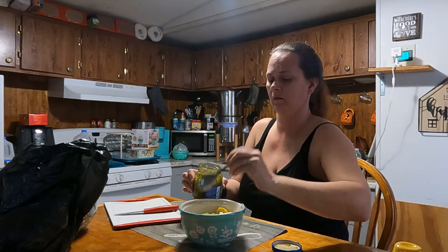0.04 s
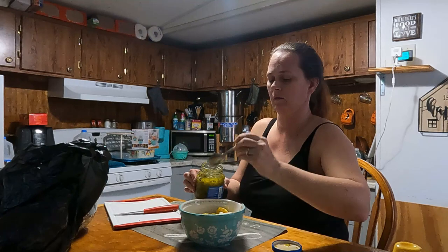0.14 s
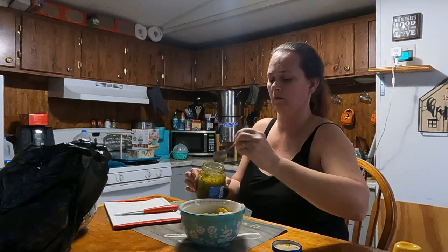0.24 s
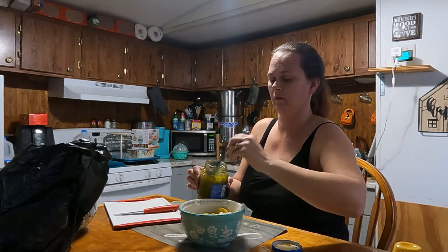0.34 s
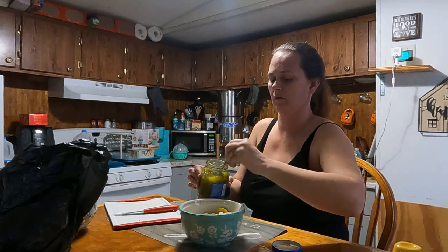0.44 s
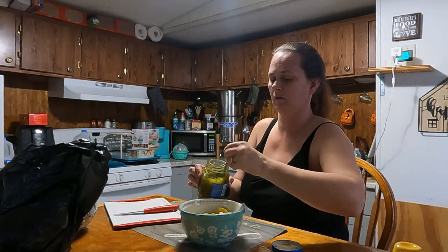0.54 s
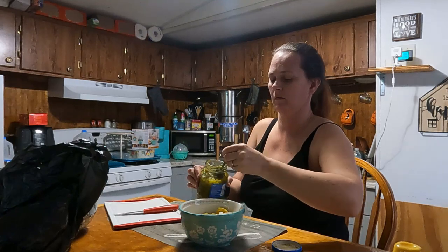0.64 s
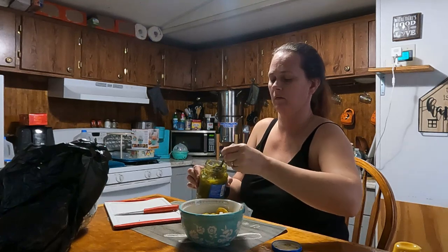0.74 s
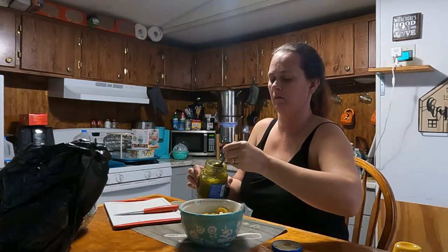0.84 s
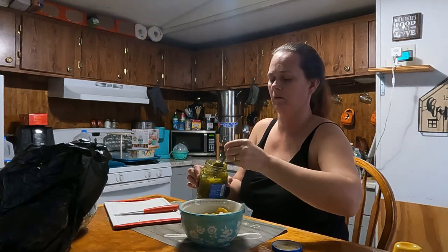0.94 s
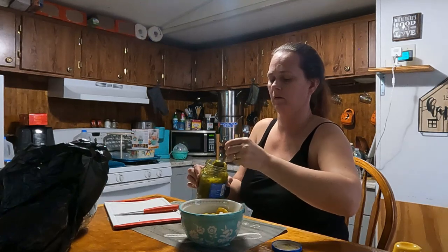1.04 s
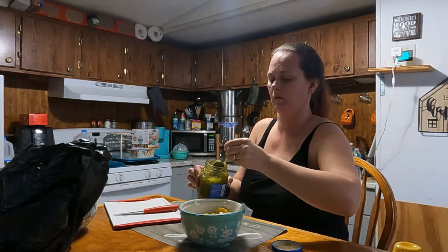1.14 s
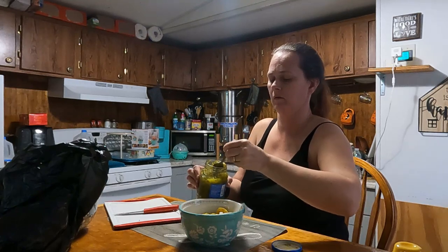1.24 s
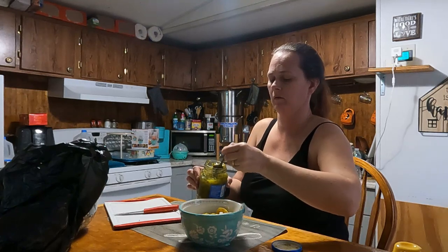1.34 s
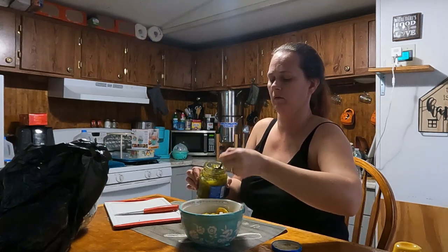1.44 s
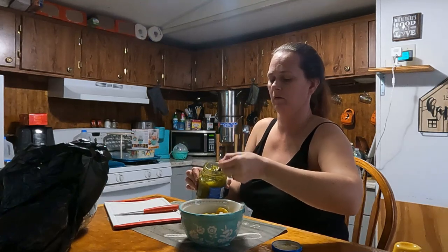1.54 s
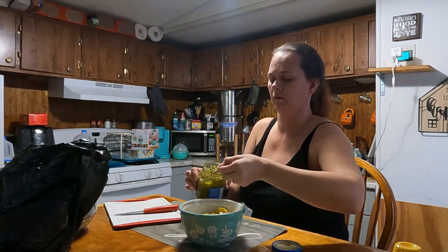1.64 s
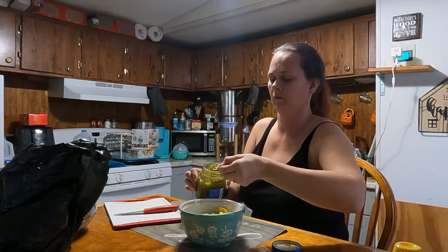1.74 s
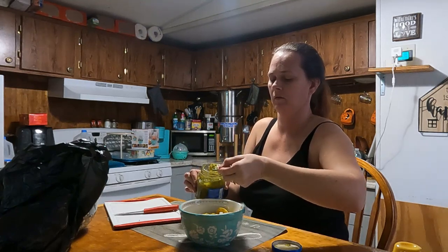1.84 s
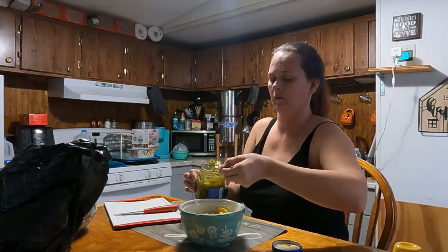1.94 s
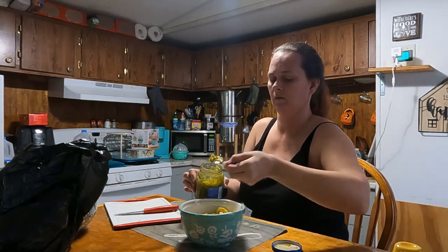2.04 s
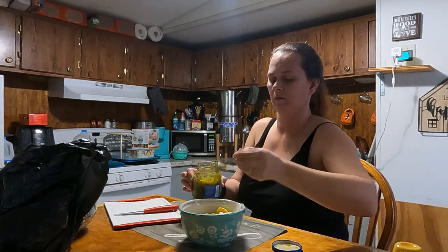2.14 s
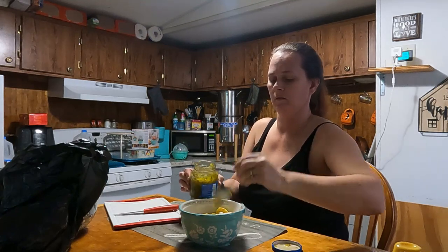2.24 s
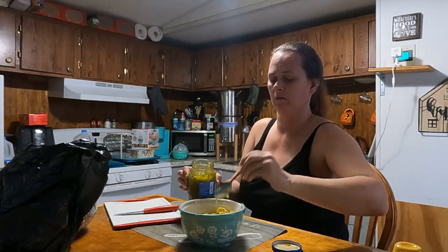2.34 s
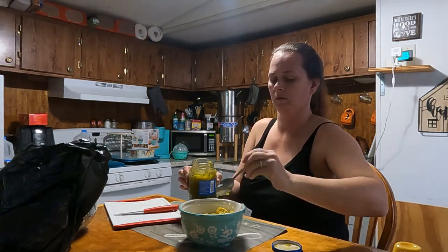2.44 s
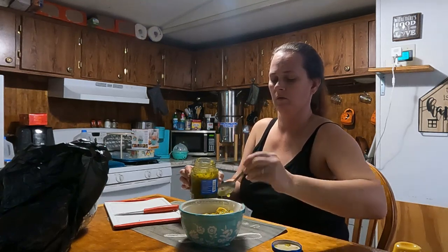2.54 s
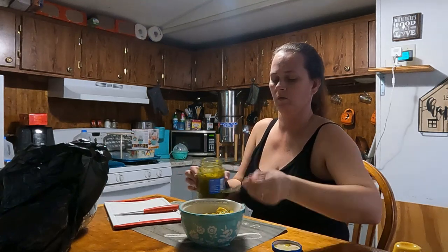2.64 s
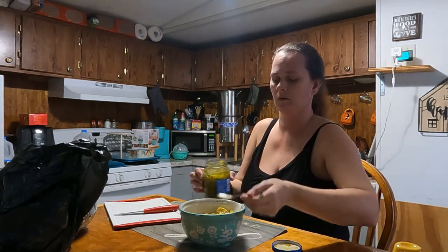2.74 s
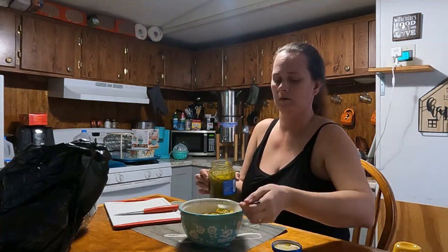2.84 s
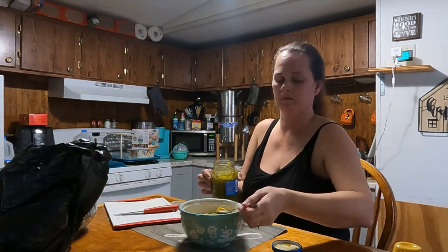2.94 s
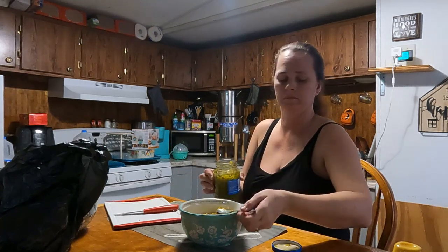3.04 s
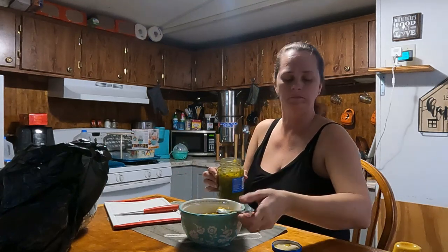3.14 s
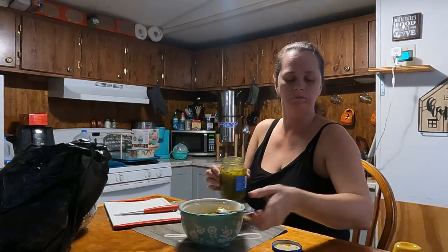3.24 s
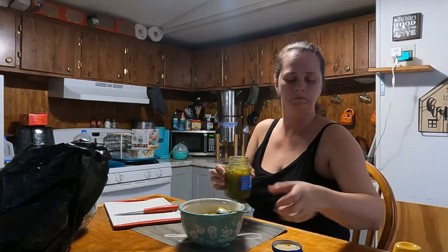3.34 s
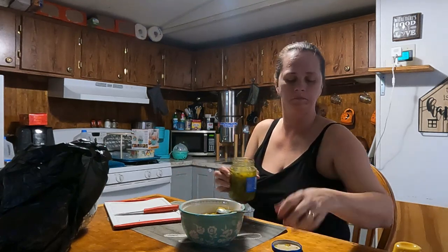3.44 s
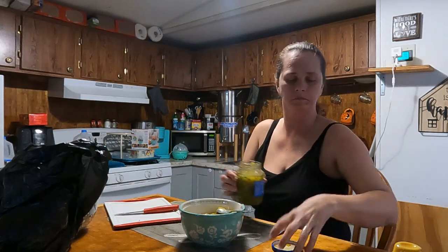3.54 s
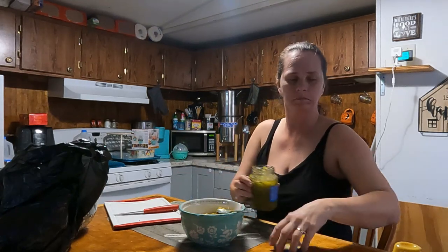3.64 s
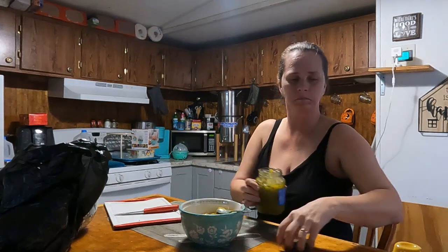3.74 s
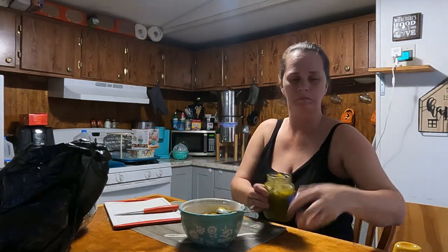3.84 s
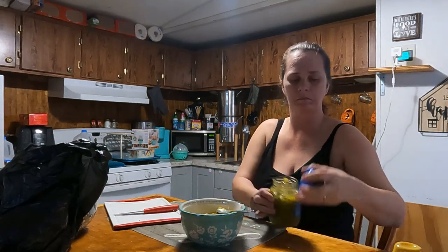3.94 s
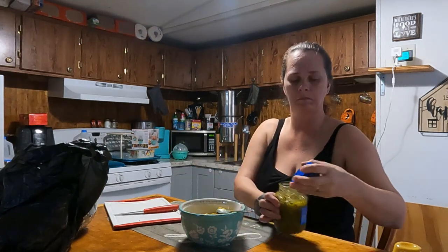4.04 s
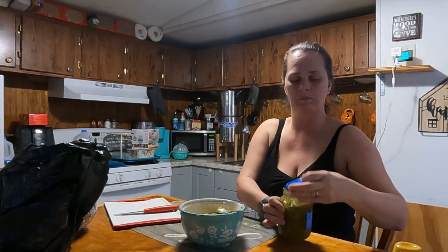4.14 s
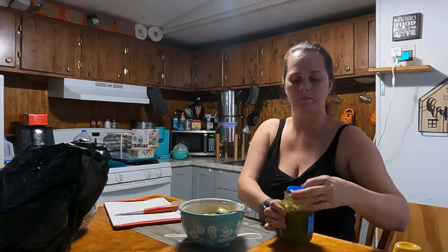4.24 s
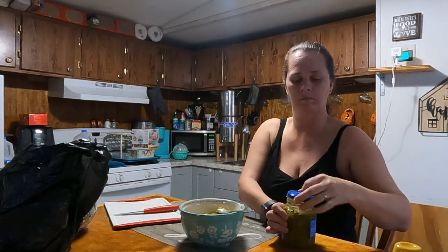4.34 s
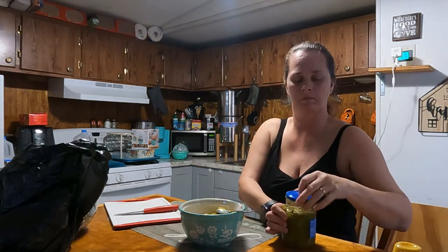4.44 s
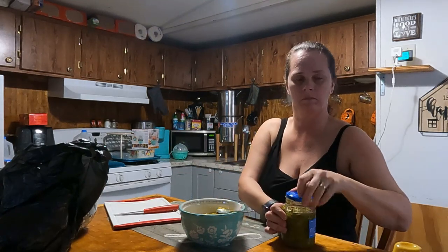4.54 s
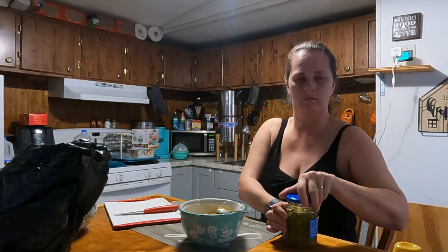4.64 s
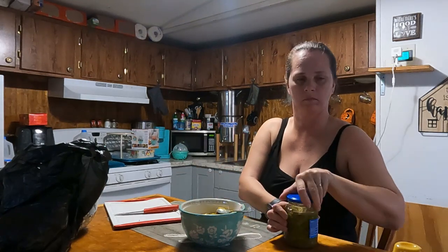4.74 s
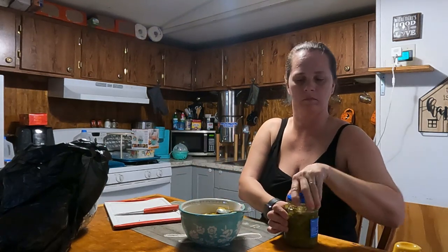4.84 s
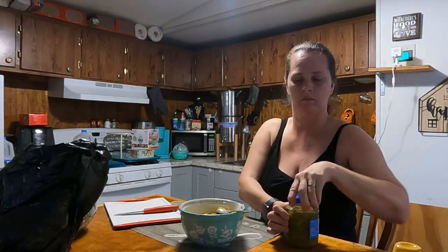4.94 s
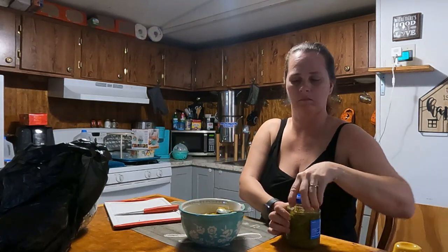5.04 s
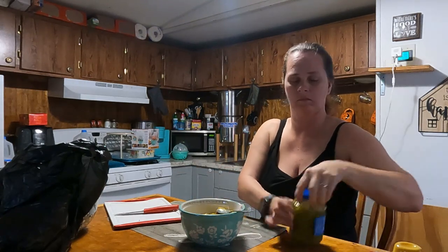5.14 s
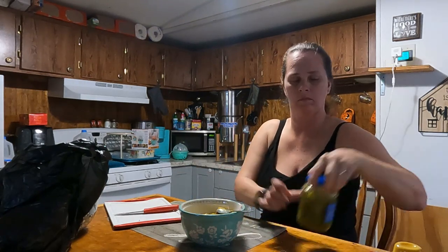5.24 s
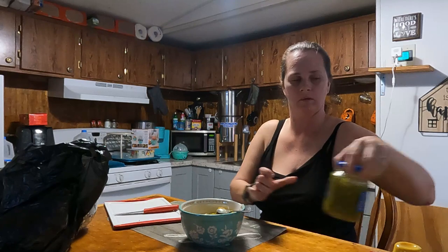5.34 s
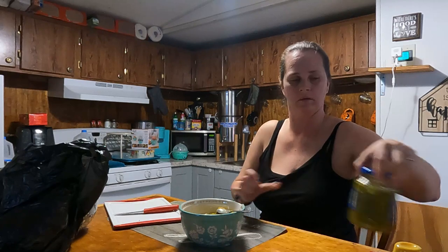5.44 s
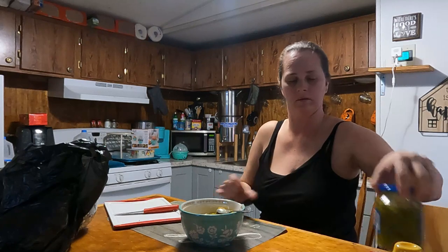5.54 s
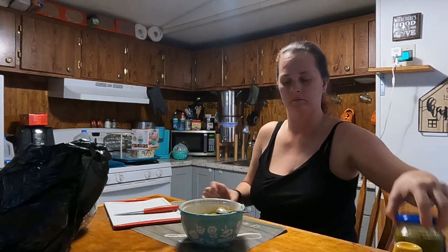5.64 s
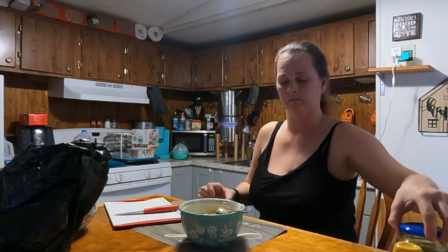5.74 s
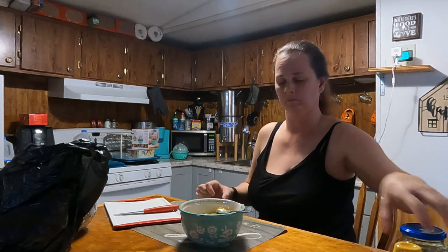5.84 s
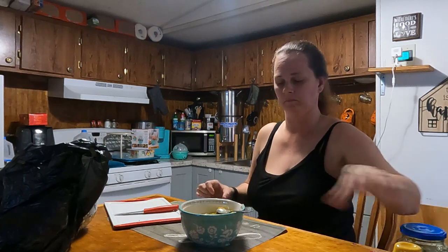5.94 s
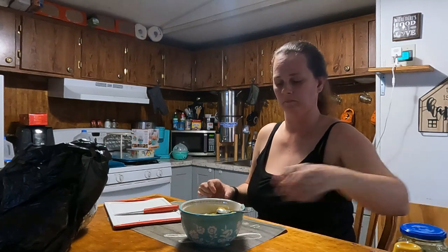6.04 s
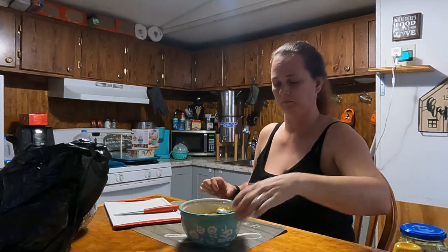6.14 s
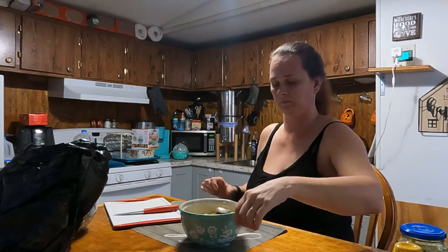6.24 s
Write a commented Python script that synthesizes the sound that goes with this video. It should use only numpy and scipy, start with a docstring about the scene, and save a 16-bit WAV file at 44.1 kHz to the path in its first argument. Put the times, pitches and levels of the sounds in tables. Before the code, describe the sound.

A spoon clinks on a full glass jar, then in a ceramic bowl; a lid is knocked on, twisted tight, and the jar thumps down.

```python
"""Jar, spoon and lid at a kitchen table

A spoon clinks in the neck of a full glass jar and is laid in a ceramic bowl. A lid is picked up, knocked onto
the jar and screwed tight while the jar bumps the table; the jar is set down and the spoon jingles in the bowl.
Blows are clicks with noise chatter driving decaying modes; the thread is random slips, clatter is noise puffs.
An appliance drones and hisses behind as coloured noise; the small room rings briefly."""
import sys
import numpy as np
from scipy import signal
from scipy.fft import rfft, irfft
from scipy.io import wavfile

SR = 44100
rng = np.random.default_rng(int(sys.argv[2]) if len(sys.argv) > 2 else 0)


def file_out(sig):
    """Save sig as 16-bit WAV at sys.argv[1]."""
    # one column per channel
    cols = np.atleast_2d(sig).T
    # limit, then scale
    lim = np.clip(cols, -1, 1)
    pcm = np.round(lim * 32767).astype(np.int16)
    wavfile.write(sys.argv[1], SR, pcm)


N = 277565

# room tone level, lower late on: t/s, level/dB rms
TONE_LEVEL = [(0, -48.5), (4.1, -48.5), (5.25, -51.5), (5.55, -49.5), (5.85, -49), (6.29, -55)]
# room tone colour, relative: f/Hz, density/dB
TONE_SPECTRUM = [(15, -72.5), (25, -50), (48, -19.5), (132, -18.5), (178, 0.5), (221, -7), (252, -3),
                 (456, -8), (2230, -21), (3070, -21.5), (3910, -29.5), (6880, -37.5), (9010, -57),
                 (11800, -47), (15400, -71)]
# casing resonances on that colour: f/Hz, width/Hz, lift/dB
TONE_PEAKS = [(57, 14, 0.5), (253, 7.3, 15.5), (312, 22, 7), (3023, 380, 6.5)]

# echo decay: f/Hz, t60/s
ROOM_T60 = [(100, 0.2), (300, 0.33), (1000, 0.35), (3000, 0.31), (8000, 0.3), (14000, 0.31)]
ROOM_DB, ROOM_GAP_S = -3, 0.0015

# noise puffs: spoon clatter, the lid picked up, brushing, rattle after table knocks:
# t/s, level at onset/dB, centre f/Hz, t60/s
NOISE_PUFFS = [(.064, -59, 4750, 0.034), (0.48, -29, 3520, 0.12), (.503, -30, 2500, 0.12),
               (1.392, -64, 3250, 0.23), (2.42, -42, 4760, 0.021), (2.88, -55, 1500, 0.46),
               (3.801, -42.5, 1500, 0.17), (3.809, -27.5, 1750, 0.035), (4.459, -28, 1500, 0.053),
               (4.791, -30, 2770, 0.12), (5.042, -43, 2140, 0.029), (5.866, -30.5, 1500, 0.38)]
PUFF_WIDTH = 0.86   # times the centre
# cloth swishes as the arm carries the jar away
SWISH_S, SWISH_SPREAD_S, SWISH_DB, SWISH_HZ = 5.6, 0.16, -60, 3050

# single short rings and soft low thuds, one of them the lid: t/s, strength/dB, f/Hz, t60/s
RINGS_AND_THUDS = [(0.744, -35, 1400, 0.02), (2.894, -42.5, 1770, 0.047), (2.93, -46, 1830, 0.048),
                   (2.951, -46, 2520, 0.045), (2.974, -51, 1830, .06), (3.008, -28.5, 230, .06),
                   (3.02, -47.5, 1826, 0.05), (3.024, -25.5, 241, 0.055), (4.585, -28, 3950, 0.046),
                   (5.714, -35.5, 2180, 0.011), (5.87, -60, 1855, 4.4)]

# hand, bowl, jar and the lid as it is picked up, on the table top: t/s, strength/dB, favoured f/Hz
TABLE_KNOCKS = [(2.877, -43, 265), (3.193, -30.5, 242), (3.808, -25.5, 527), (4.462, 1, 326),
                (4.519, -13, 280), (4.589, -24, 258), (4.804, -14.5, 250), (4.821, -20, 396),
                (5.039, -19.5, 380), (5.068, -38.5, 400), (5.091, -40, 300), (5.854, -15, 450),
                (5.8636, 1, 243)]
# table top modes: f/Hz, level/dB, t60/s
TABLE_MODES = [(153.6, -15, 0.066), (190, -4, 0.027), (202, -10.5, 0.06), (265, -3.5, 0.047),
               (320.2, -5.5, 0.034), (346, -0.5, 0.014), (380, -4.5, 0.057), (450, -13, 0.054),
               (599, -8, 0.022), (703, -9.5, 0.018), (830, -20.5, 0.069), (967, -14.5, 0.019),
               (1400, -13.5, 0.0043), (2100, -20.5, 0.012), (2900, -13.5, 0.0033), (4000, -37, 0.0021),
               (6200, -48, .003)]
# microphone stand modes, shaken by the table: f/Hz, level/dB, t60/s
STAND_MODES = [(31.6, -63, 0.33), (58.5, -43, 0.49), (88.4, -49, 0.54)]
# stronger knocks are harder: hardness at 0 dB, and its change per dB of strength
TABLE_HARDNESS_DB_PER_OCT, TABLE_HARDER_PER_DB, TABLE_CHATTER_S = 0.47, 0.23, 0.0057

# lid knocks the glass and the air under it pops: t/s, knock/dB, pop/dB, pop f/Hz
LID_ON_JAR = [(4.2603, -18.5, -14, 930), (4.266, -15, -18, 960), (4.3631, -11, -9, 861),
              (4.386, -29, -42, 830), (4.418, -18.5, -9, 896), (4.425, -21, -37, 894),
              (4.504, -25, -12, 880), (4.56, -46, -16, 805), (4.571, -32, -42, 710),
              (4.5855, -26.5, -7, 753), (4.658, -51.5, -23.5, 814), (4.691, -40, -16, 770),
              (4.722, -37, -25.5, 745), (4.737, -36, -11.5, 710), (4.756, -44, -18, 650),
              (4.79, -17, -5.5, 860), (4.798, -10, -6.5, 830), (4.803, -16.5, -6, 650),
              (4.811, -23.5, -32, 830), (4.971, -45, -29.5, 860), (4.986, -35, -31, 790),
              (5.0215, -40.5, -19, 747), (5.173, -51, -36, 600)]
# lid modes: f/Hz, level/dB, t60/s
LID_MODES = [(1320, -27.5, 0.009), (1880, -15.5, 0.0063), (2167, -13.5, 0.021), (2670, -3, 0.0019),
             (3372, -7.5, 0.031), (3470, -7, 0.0049), (3700, -14.5, 0.017), (4034, -13, 0.021),
             (3970, -9, 0.0033), (4320, -12, 0.013), (4840, -17, 0.013), (5400, -10.5, 0.0054),
             (6250, -20.5, 0.0046), (6870, -22.5, 0.014), (7630, -18.5, 0.0022), (9800, -29.5, 0.006),
             (10700, -27.5, 0.0059), (11500, -23, 0.0027), (11860, -35, 0.018)]
LID_FAVOURED_HZ, LID_HARDER_PER_DB, LID_CHATTER_S = 3840, 0.284, 0.028
POP_T60_S = 0.021

# twists of the lid, loudest as the thread bites: bite t/s, level/dB
TWISTS = [(4.55, -45.5), (4.791, -26.5), (4.98, -43)]
TWIST_RISE_DB_PER_S, TWIST_FALL_DB_PER_S = 174, 302
# modes of lid and trapped air under thread slip: f/Hz, level/dB, t60/s
THREAD_MODES = [(650, -1, 0.027), (710, -13, 0.023), (860, -9.5, 0.047), (1000, -32.5, .02),
                (2120, -20, 0.0092), (3130, -17.5, 0.017), (3950, -26, 0.017), (5000, -18, 0.004)]

# spoon on the neck of the jar: t/s, strength/dB, hardness/dB per octave, favoured f/Hz
SPOON_ON_JAR = [(.481, -28.5, -11.5, 2100), (.502, -18.5, -5, 5350), (.508, -25, 13.5, 2100),
                (.6215, -27, -4, 2860), (.626, -29.5, 0.5, 5700), (.7222, -35, -7, 2900),
                (1.1053, -33.5, -6, 5400)]
# spoon laid in the bowl, later jolted: t/s, strength/dB, favoured f/Hz
SPOON_IN_BOWL = [(3.185, -28, 4800), (3.192, -24, 2720), (3.198, -24.5, 1120), (3.212, -25.5, 1120),
                 (3.23, -25, 7300), (5.88, -42, 2750), (5.893, -34.5, 2750), (5.913, -41.5, 4960)]
# jar modes, the shortest being the crack of contact: f/Hz, level/dB, t60/s
JAR_MODES = [(1030, -14.5, 0.0024), (1500, -9, 0.0019), (2070, -8.5, 0.0061), (2160, -18, 0.021),
             (2380, -19.5, 0.014), (2926, 1.5, 0.029), (2940, -8, 0.05), (3060, -9, 0.043),
             (3185, -7.5, 0.1), (3110, -8.5, 0.0038), (3250, -5.5, 0.026), (3510, -7.5, 0.023),
             (3880, -6, 0.018), (4400, -9, 0.0025), (5370, -1, 0.022), (5480, -20.5, .04),
             (5690, -2.5, 0.022), (5950, -10.5, 0.016), (6470, -9.5, 0.0065), (7430, -26.5, .02),
             (7300, -37, 0.0025), (8450, -26, 0.066), (9240, -18.5, .003), (9950, -29.5, 0.017),
             (11020, -45.5, .03), (11300, -22.5, 0.0054), (12800, -32.5, .015), (15000, -19, .04)]
# bowl modes, likewise: f/Hz, level/dB, t60/s
BOWL_MODES = [(600, -1.5, 0.013), (1116.5, -3.5, 0.13), (1500, -10.5, 0.022), (2100, -17, 0.011),
              (2701, 3, 0.044), (2758, 1.5, 0.1), (3100, -13.5, 0.045), (3700, -8, 0.011),
              (4240, -14, 0.023), (4653, -12, 0.048), (4888, -8, 0.071), (5670, -20, 0.013),
              (6885, -21, 0.079), (7445, -26.5, 0.11), (8520, -24.5, 0.06), (10320, -28.5, 0.059),
              (9500, -21, 0.003), (11100, -21, 0.055), (11400, -3, 0.0015), (12800, -36, .03),
              (13500, -34, .008)]
JAR_CHATTER_S = 0.014
BOWL_HARDNESS_DB_PER_OCT, BOWL_CHATTER_S = 1.6, 0.02

LASTING_S = 0.014   # modes with a longer t60 are levelled against the chatter
BASS_CUT_HZ, TREBLE_CUT_HZ = 145, 14600
NOTCH_HZ, NOTCH_WIDTH_HZ, NOTCH_DEPTH = 8970, 1200, 0.66   # the microphone port
CUTOFF_HZ = 15400


def from_db(db):
    """dB to gain."""
    return 10 ** (np.asarray(db) / 20)


def rms_one(x):
    """Scale to rms 1."""
    return x / np.sqrt(np.mean(x ** 2) + 1e-20)


def at_hz(points, hz):
    """Read a curve over frequency on a log-frequency axis."""
    f, values = np.transpose(points)
    return np.interp(np.log(hz), np.log(f), values)


def broad_noise(noise, hz, width):
    """Noise twice through a broad resonance; rms 1."""
    band = signal.iirpeak(hz, 1 / width, fs=SR)
    return rms_one(signal.lfilter(*band, signal.lfilter(*band, noise)))


def ring(clicks, hz, t60_s):
    """Two-pole resonator: a unit click starts a decaying sine of height 1."""
    r = from_db(-60 / (max(t60_s, 1e-3) * SR))
    w = 2 * np.pi * hz / SR
    return signal.lfilter([0, np.sin(w)], [1, -2 * r * np.cos(w), r * r], clicks + 1e-18)


def sing(drive, hz, t60_s, onset_cycles=4.4):
    """A mode takes a few cycles to speak, so it sends little sound far from its pitch."""
    r = from_db(-60 * hz / (onset_cycles * SR))
    w = 2 * np.pi * hz / SR
    onset = signal.lfilter([1 - r, 0, r - 1], [1, -2 * r * np.cos(w), r * r], drive)
    return ring(onset, hz, t60_s)


def strike(s, strength_db, hardness, chatter_s, favoured_hz, modes, pivot_hz, spread_db, chatter_db,
           favour_db=6, favour_octaves=0.23):
    """Click plus dying chatter drives the modes; hardness tilts them, the spot hit varies and favours some."""
    t = np.arange(SR // 20) / SR
    spot = rng.standard_normal((len(s), len(modes)))
    noise = rng.standard_normal((len(s), len(t)))
    chatter_s = np.maximum(chatter_s + 0 * s, 1e-3)[:, None]   # one row per blow
    chatter = from_db(chatter_db - 60 * t / chatter_s) * noise / np.sqrt(SR * chatter_s / 14)
    contact = (t == 0) + chatter
    at, start = (s * SR).astype(int), int(min(s) * SR)
    out = np.zeros(N)
    for k, (hz, mode_db, t60_s) in enumerate(modes):
        favour = favour_db * np.exp(-(np.log2(hz / favoured_hz) / favour_octaves) ** 2)
        tilt = hardness * np.log2(hz / pivot_hz)
        gain = from_db(strength_db + mode_db + tilt + favour + spread_db * spot[:, k])
        if t60_s > LASTING_S:   # offset the chance strength of the contact at this pitch, within limits
            gain = gain / np.clip(abs(contact @ np.exp(2j * np.pi * hz * t)), .4, 2.5)
        drive = np.zeros(N)
        np.add.at(drive, at[:, None] + np.arange(len(t)), gain[:, None] * contact)
        out[start:] += (-1) ** k * sing(drive[start:], hz, t60_s)
    return out


def single_modes(rows):
    """One click into one mode per row: t/s, strength/dB, f/Hz, t60/s."""
    out = np.zeros(N)
    for s, strength_db, hz, t60_s in rows:
        at = int(s * SR)
        click = np.zeros(min(N - at, SR // 2))
        click[0] = 1
        out[at:at + len(click)] += from_db(strength_db) * sing(click, hz, t60_s, onset_cycles=5.3)
    return out


def room_tone():
    """Noise coloured by the appliance and its casing resonances."""
    level_db = np.interp(np.arange(N) / SR, *np.transpose(TONE_LEVEL))
    hz = np.maximum(np.fft.rfftfreq(N, 1 / SR), 1)
    colour_db = at_hz(TONE_SPECTRUM, hz)
    for f, width_hz, lift_db in TONE_PEAKS:
        colour_db = colour_db + lift_db / (1 + (2 * (hz - f) / width_hz) ** 2)
    tone = irfft(rfft(rng.standard_normal(N)) * from_db(colour_db), N)
    return from_db(level_db) * rms_one(tone)


def kitchen(x):
    """Diffuse echoes: noise that dies at its own rate in every half octave, after a short gap."""
    t = np.arange(SR // 2) / SR
    edges_hz = 50 * 2 ** np.arange(0, 8.6, .5)
    white = rng.standard_normal((2, len(t)))   # alternated, so neighbouring bands differ
    echoes = np.zeros(len(t))
    for k, (low, high) in enumerate(zip(edges_hz, edges_hz[1:])):
        sos = signal.butter(2, [low, high], "band", fs=SR, output="sos")
        decay = from_db(-60 * t / at_hz(ROOM_T60, np.sqrt(low * high)))
        echoes += signal.sosfilt(sos, white[k % 2]) * decay
    echoes = echoes * (t > ROOM_GAP_S) / np.sqrt(np.sum(echoes ** 2))
    return from_db(ROOM_DB) * signal.fftconvolve(x, echoes)[:N]


def swish():
    """Cloth rubbing: band noise under one slow swell."""
    swell = np.exp(-((np.arange(N) / SR - SWISH_S) / SWISH_SPREAD_S) ** 2)
    return from_db(SWISH_DB) * swell * broad_noise(rng.standard_normal(N), SWISH_HZ, width=0.27)


def noise_puffs():
    """Clatter, brushing and rattle: dying puffs of noise in a broad band."""
    t = np.arange(SR // 3) / SR
    out = np.zeros(N)
    for s, level_db, hz, t60_s in NOISE_PUFFS:
        at = int(s * SR)
        puff = broad_noise(rng.standard_normal(len(t)), hz, PUFF_WIDTH)
        out[at:at + len(t)] += from_db(level_db - 60 * t / t60_s) * puff
    return out


def rings_and_thuds():
    """Single short rings and soft low thuds, one mode each."""
    return single_modes(RINGS_AND_THUDS)


def table(modes, pivot_hz, spread_db, chatter_db):
    """Knocks on the table top, heard through the given modes."""
    s, db, hz = np.transpose(TABLE_KNOCKS)
    hardness = TABLE_HARDNESS_DB_PER_OCT + TABLE_HARDER_PER_DB * db
    return strike(s, db, hardness, TABLE_CHATTER_S, hz, modes, pivot_hz, spread_db, chatter_db)


def thread(slips_per_s=450, uneven_db=4.0):
    """Uneven little slips of the thread shake the lid and the air under it."""
    t = np.arange(N) / SR
    level = np.zeros(N)
    for s, db in TWISTS:   # rises to the bite, then lets go
        level += from_db(db - np.maximum(TWIST_RISE_DB_PER_S * (s - t), TWIST_FALL_DB_PER_S * (t - s)))
    slips = rng.random(N) < slips_per_s / SR
    size = from_db(uneven_db * np.minimum(rng.exponential(1, N), 4))
    slips = slips * size * rng.choice([-1, 1], N)
    rub = sum(from_db(db) * sing(slips, hz, t60_s) for hz, db, t60_s in THREAD_MODES)
    return level * rms_one(rub)


def air_pops():
    """Air under the lid pops at each knock, as a single short mode."""
    return single_modes([(s, pop_db, hz, POP_T60_S) for s, _, pop_db, hz in LID_ON_JAR])


def lid():
    """The lid's knocks on the glass; stronger ones are harder."""
    s, db = np.transpose(LID_ON_JAR)[:2]
    return strike(s, db, LID_HARDER_PER_DB * db, LID_CHATTER_S, LID_FAVOURED_HZ, LID_MODES,
                  pivot_hz=3140, spread_db=3.0, chatter_db=4.5)


def spoon_in_bowl():
    """The spoon rings the ceramic bowl, with one hardness for all blows."""
    s, db, hz = np.transpose(SPOON_IN_BOWL)
    return strike(s, db, BOWL_HARDNESS_DB_PER_OCT, BOWL_CHATTER_S, hz, BOWL_MODES,
                  pivot_hz=2690, spread_db=2.5, chatter_db=-6.0)


def spoon_on_jar():
    """The spoon rings the glass; each blow has its own hardness."""
    s, db, hardness, hz = np.transpose(SPOON_ON_JAR)
    return strike(s, db, hardness, JAR_CHATTER_S, hz, JAR_MODES,
                  pivot_hz=4000, spread_db=3.5, chatter_db=1.5)


def scene():
    """Everything on the table, its echoes, the shaken stand and the room tone."""
    near = swish() + noise_puffs() + rings_and_thuds()
    near += table(TABLE_MODES, pivot_hz=300, spread_db=2.35, chatter_db=-13.0)
    near += thread() + air_pops() + lid() + spoon_in_bowl() + spoon_on_jar()
    # the microphone cuts the bass and the extreme top
    sos = signal.butter(4, [BASS_CUT_HZ, TREBLE_CUT_HZ], "band", fs=SR, output="sos")
    near = signal.sosfilt(sos, near)
    stand = table(STAND_MODES, pivot_hz=60, spread_db=3.5, chatter_db=-6.5)
    return (near + kitchen(near) + stand + room_tone())[None]


def record(dry):
    """The port swallows a treble band, peaks are rounded, the top is cut."""
    band = signal.lfilter(*signal.iirpeak(NOTCH_HZ, NOTCH_HZ / NOTCH_WIDTH_HZ, fs=SR), dry)
    heard = 1.247 * np.tanh((dry - NOTCH_DEPTH * band) / 1.423)
    return signal.sosfilt(signal.cheby2(12, 70, CUTOFF_HZ, fs=SR, output="sos"), heard)


dry = scene()
out = record(dry)
file_out(out)
```